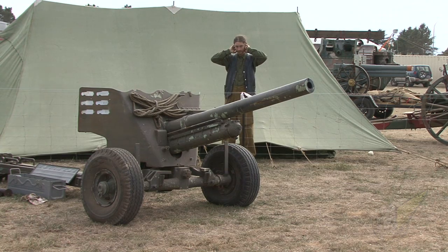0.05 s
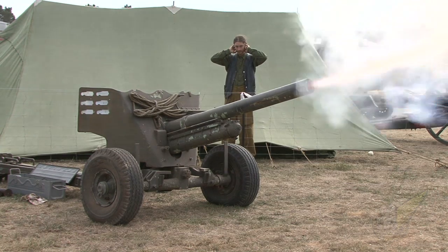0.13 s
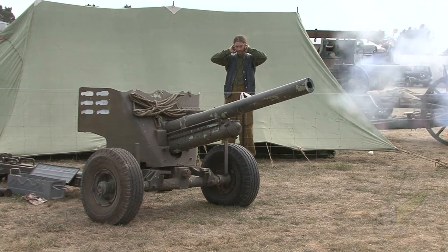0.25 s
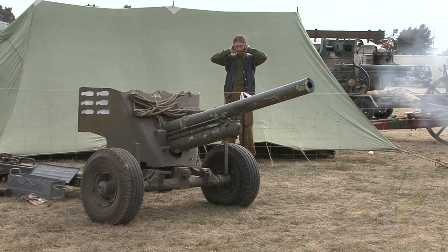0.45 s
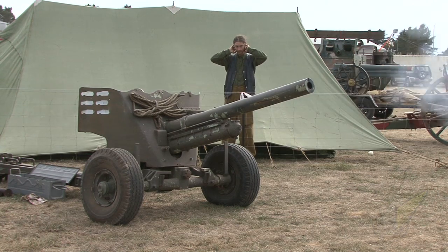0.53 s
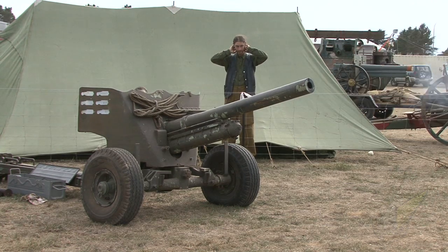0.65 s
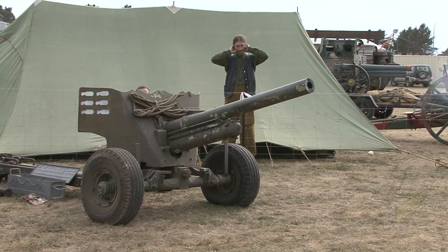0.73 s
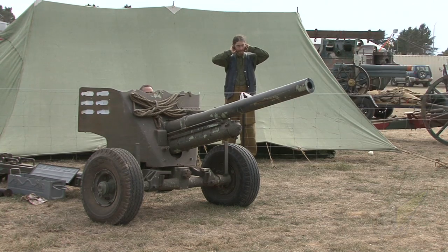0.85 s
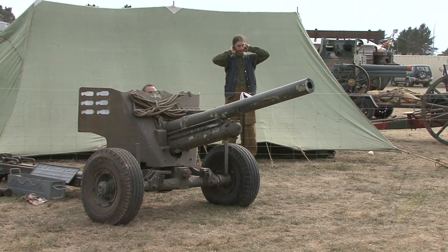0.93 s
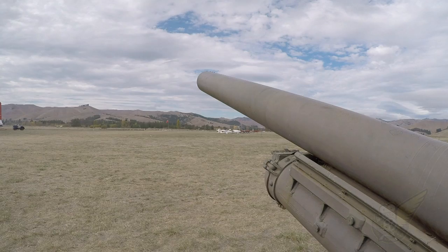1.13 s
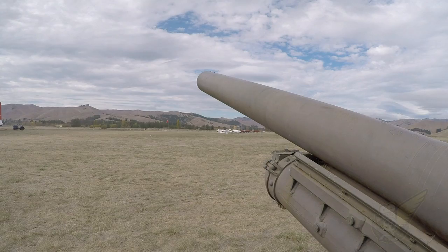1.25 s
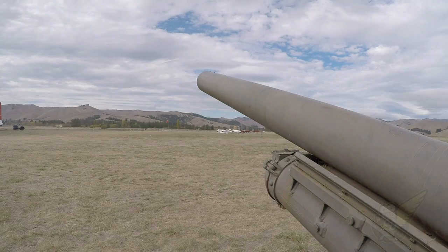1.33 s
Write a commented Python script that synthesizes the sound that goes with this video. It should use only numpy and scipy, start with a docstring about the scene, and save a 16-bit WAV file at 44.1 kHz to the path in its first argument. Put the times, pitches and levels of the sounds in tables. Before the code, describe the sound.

A cannon fires one loud blast that echoes and rolls away over an open field.

```python
"""A field gun fires one round on open grass: a shock front and a burst of gas overload the microphone.
The blast rings the gun's steel, loose parts clang in the recoil and small fittings jingle.
The sound scatters from the ground as a roar, reflects off tents and vehicles as slaps, and rolls away.
A light outdoor background lies beneath; near the end all drops abruptly to a quieter, duller one."""
import sys
import numpy as np
from scipy import signal
from scipy.io import wavfile

SR = 44100
rng = np.random.default_rng(int(sys.argv[2]) if len(sys.argv) > 2 else 0)


def file_out(sig):
    """Save sig as 16-bit WAV at sys.argv[1]."""
    # one column per channel
    cols = np.atleast_2d(sig).T
    # limit, then scale
    lim = np.clip(cols, -1, 1)
    pcm = np.round(lim * 32767).astype(np.int16)
    wavfile.write(sys.argv[1], SR, pcm)


N = 61739
TIME = np.arange(N) / SR
SHOT_S, DROP_S = .2125, 1.215


def from_db(db):
    """Amplitude ratio of a level in decibels."""
    return 10 ** (np.asarray(db) / 20)


def unit_rms(x):
    """Normalisation to rms 1."""
    return x / np.sqrt(np.mean(x ** 2) + 1e-20)


def at_hz(points, hz):
    """Interpolation on a logarithmic frequency axis."""
    freqs, values = np.transpose(points)
    return np.interp(np.log(hz), np.log(freqs), values)


def filtered(x, hz, kind, order=2):
    """Butterworth filter."""
    sections = signal.butter(order, np.clip(hz, 10, .45 * SR), kind, fs=SR, output="sos")
    return signal.sosfilt(sections, x + 1e-18)


def drift(rate_hz):
    """Slow random fluctuation of rms 1."""
    return unit_rms(filtered(rng.standard_normal(2 * N), rate_hz, "low")[N:])


def envelope(start, rise, t60, hold=0):
    """Linear rise, hold, then exponential decay of 60 dB in t60; times in seconds."""
    age = TIME - start
    return np.clip(age / rise, 0, 1) * from_db(-60 * np.maximum(age - rise - hold, 0) / t60)


def noise(spectrum, flutter_db=0, shape=lambda hz: 1):
    """Fluttering third-octave bands of total rms near 1, each then multiplied by shape(hz)."""
    edges = np.geomspace(22, 17500, 30)
    white, common = rng.standard_normal((2, N + 8192)), drift(45)
    out, power = 0, 0
    for k, (low, high) in enumerate(zip(edges, edges[1:])):
        hz = np.sqrt(low * high)
        band = filtered(white[k % 2], [low, high], "band")[-N:]
        if flutter_db:
            band = band * from_db(flutter_db * (.7 * common + 1.2 * drift(27)))
        gain = from_db(at_hz(spectrum, hz)) * np.sqrt(high - low)
        out = out + gain * unit_rms(band) * shape(hz)
        power += gain ** 2
    return out / np.sqrt(power)


# Background spectra before and after the drop: f/Hz, relative density level/dB
AIR_SPECTRUM = [(30, -12), (100, 1), (170, 2), (260, -14.5), (500, -16), (1000, -4.5), (1700, -19),
                (4300, -27.5), (5800, -37.5), (7200, -51.5), (15000, -51)]
CALM_SPECTRUM = [(30, -11.5), (100, 0.5), (160, -5.5), (370, -15), (550, -16.5), (900, -18), (1700, -30.5),
                 (5500, -46), (15000, -51)]
def background(spectrum, level_db):
    """Ambient noise: a steady spectrum whose bands flutter slightly."""
    return from_db(level_db) * noise(spectrum, flutter_db=.5)


# Spectrum of the late return: f/Hz, relative density level/dB
FAR_SPECTRUM = [(300, -18), (1000, 18.5), (2500, 9.5), (4500, 2.5), (8000, -37), (16000, -34)]
def far_return():
    """Long-path reflection: one soft, bright echo arrives late from far off."""
    return from_db(-39.5) * noise(FAR_SPECTRUM, flutter_db=3.5) * envelope(.851, rise=.047, t60=.89)


# Spectrum of the roll: f/Hz, relative density level/dB
ROLL_SPECTRUM = [(30, -34), (65, -4), (160, 0.5), (260, -15), (520, -16.5), (950, -15.5), (1700, -20),
                 (2600, -18), (5500, -36.5), (8000, -50), (15000, -74.5)]
# Its decay: f/Hz, T60/s
ROLL_DECAY = [(50, 1.2), (150, 1.42), (500, 1.03), (3000, 0.71), (12000, 0.42)]
def roll():
    """Reverberation: the report swells and rolls away over the field, the bass lasting longest."""
    def swell(hz):
        return envelope(SHOT_S + .19, rise=.28, t60=at_hz(ROLL_DECAY, hz))
    return from_db(-26) * noise(ROLL_SPECTRUM, flutter_db=2, shape=swell)


# Low echoes: t/s, level/dB, f/Hz, T60/s
BOOMS = [(.256, -11, 129.8, .26), (0.387, -14, 199, 0.12), (0.475, -18, 230, 0.15), (.572, -16, 250, 0.05),
         (0.565, -16.5, 55.6, 0.048), (.614, -16, 361, 0.059), (.634, -15, 98, 0.057),
         (.665, -7, 172, 0.043), (0.811, -37, 85.5, 0.24), (0.823, -28.5, 147.6, 0.26),
         (0.889, -29.5, 178, 0.22)]
def booms():
    """Damped oscillation: echoes that have lost their treble swing at one low frequency each."""
    return sum(from_db(db) * np.sin(2 * np.pi * hz * (TIME - t)) * envelope(t, rise=.004, t60=t60)
               for t, db, hz, t60 in BOOMS)


# Spectra of a slap's crack and scatter: f/Hz, relative density level/dB
CRACK_SPECTRUM = [(100, -3), (1000, 3), (4300, 2.5), (6500, -14), (16000, -24)]
SCATTER_SPECTRUM = [(40, -9.5), (200, -8), (900, 7), (2000, 1), (4500, -2), (7000, -11), (11500, -16),
                    (16000, -49)]
# Reflections: t/s, ring level/dB, ring f/Hz, crack level/dB,
# then for the scatter: level/dB, rise/s, T60/s, cutoff f/Hz
SLAPS = [(.243, -5, 1850, -26, -8.5, .008, 0.098, 5000), (0.268, -5, 1010, -14, -13, .002, 0.059, 5000),
         (.305, -21, 1200, -36, -26, 0.0084, 0.16, 9000),
         (0.3333, -7.5, 420, -16, -16.5, 0.0017, .07, 5000), (.3437, -6, 2640, -2, -13, .001, 0.17, 8100),
         (0.3887, -3.5, 294, -13, -23, 0.0026, 0.044, 5000),
         (.3945, 1.5, 1070, -21.5, -32, .002, 0.088, 4040),
         (.4735, -1.5, 1384, -10, -10.5, 0.0035, 0.052, 4000),
         (.510, -36, 1750, -36, -26, .010, 0.12, 9000),
         (0.5563, 0.5, 1510, -16.5, -16.5, 0.0012, 0.1, 2500),
         (.5703, -2.5, 1870, -4, -18, 0.00082, 0.17, 3000), (.606, -20, 694, -23, -15, 0.0086, 0.12, 1500),
         (.658, -18, 1510, -36, -21, 0.0058, 0.091, 3000),
         (.692, -42, 1200, -42, -30.5, 0.0074, 0.14, 5000),
         (.716, -42, 1080, -42, -31.5, 0.0097, .10, 2500), (.824, -33, 1020, -47, -38, 0.011, 0.19, 2000)]
def slaps():
    """Discrete reflection: tents, vehicles and the gun return a crack, a ring and a puff of scatter."""
    scatter, snap = noise(SCATTER_SPECTRUM, flutter_db=3.5), noise(CRACK_SPECTRUM)
    out, attack_s, ring_cycles = 0, .00051, 7.5
    for k, (t, ring_db, hz, crack_db, scatter_db, rise, t60, cutoff_hz) in enumerate(SLAPS):
        shift = k * N // len(SLAPS)  # each slap has its own stretch of noise
        tone = np.sin(2 * np.pi * hz * (TIME - t))
        ring = from_db(ring_db) * tone * envelope(t, attack_s, t60=ring_cycles / hz)
        crack = from_db(crack_db) * np.roll(snap, shift) * envelope(t, attack_s, t60=.0077)
        dulled = filtered(np.roll(scatter, shift), cutoff_hz, "low", order=1)
        puff = from_db(scatter_db) * dulled * envelope(t, rise, t60)
        out = out + ring + crack + puff
    return out


# Spectrum of the roar: f/Hz, relative density level/dB
ROAR_SPECTRUM = [(25, -22.5), (60, -16.5), (100, 0.5), (170, 2.5), (280, -2.5), (500, -8.5), (850, -3.5),
                 (1200, -3), (1700, -10), (3700, -16), (5500, -22), (7500, -31.5), (11000, -25),
                 (15000, -52)]
# Its decay: f/Hz, T60/s
ROAR_DECAY = [(50, 1), (200, 0.77), (1000, 0.72), (4000, 0.81), (14000, 0.16)]
def ground_roar():
    """Diffuse scattering: dense returns from the near ground hold briefly, then die, treble first."""
    def decay(hz):
        return envelope(SHOT_S, rise=.0047, hold=.16, t60=at_hz(ROAR_DECAY, hz))
    return from_db(-13.5) * noise(ROAR_SPECTRUM, flutter_db=3.5, shape=decay)


# Modes of the small fittings: f/Hz, relative level/dB
FITTING_MODES = [(1690, 6), (2140, -0.5), (3250, 1.5), (3480, -1.5), (3750, -1), (4290, -3.5), (4560, 2.5),
                 (4850, -10), (6170, -10), (8100, -18)]
def jingle():
    """Impulse excitation: as the gun settles, random light touches ring each mode of its fittings."""
    start_s, length_s, touches_per_s, t60, level_db = .875, .10, 38, .046, -40
    shaking = (TIME > start_s) * (TIME < start_s + length_s)
    radius = from_db(-60 / (t60 * SR))
    out = 0
    for hz, db in FITTING_MODES:
        touches = shaking * (rng.random(N) < touches_per_s / SR) * rng.uniform(.4, 1, N)
        angle = 2 * np.pi * hz / SR
        poles = [1, -2 * radius * np.cos(angle), radius ** 2]
        out = out + from_db(level_db + db) * signal.lfilter([0, np.sin(angle)], poles, touches + 1e-18)
    return out


# Impacts of loose steel in the recoil: t/s, level/dB, f/Hz, T60/s
CLANGS = [(.215, 7, 573.6, 0.054), (.285, -6.5, 821, .09), (.342, -19, 1180, 0.06),
          (.464, -7.5, 913, 0.063), (0.57, -20.5, 4150, 0.099), (.572, -26, 3950, 0.033),
          (0.577, -26, 4410, 0.051), (0.572, -15, 1025, 0.06), (.778, -35, 1345, 0.08)]
def clangs():
    """Beating: each loose part rings briefly in two modes of nearly equal frequency."""
    out, upper_gain, beat_hz = 0, .15, 45
    for t, db, hz, t60 in CLANGS:
        turn = 2 * np.pi * (TIME - t)
        pair = np.sin(turn * hz) + upper_gain * np.sin(turn * (hz + beat_hz))
        out = out + from_db(db) * pair / (1 + upper_gain) * envelope(t, rise=.007, t60=t60)
    return out


# Modes of barrel and shield: f/Hz, bandwidth/Hz, relative level/dB
STEEL_MODES = [(794, 50, -0.5), (980, 50, -5.5), (1170, 55, -19.5), (1700, 170, -12.5), (1990, 70, -8.5),
               (2724, 160, -3.5), (3170, 120, -14), (4260, 300, -12.5)]
def steel_ring():
    """Resonance: shaken by the blast, barrel and shield respond in narrow bands."""
    modes = 0
    for hz, width, db in STEEL_MODES:
        band = filtered(rng.standard_normal(N), [hz - width / 2, hz + width / 2], "band", order=1)
        modes = modes + from_db(db) * unit_rms(band)
    return from_db(-23.5) * unit_rms(modes) * envelope(SHOT_S, rise=.097, t60=1)


# Spectrum of the muzzle gas: f/Hz, relative density level/dB
GAS_SPECTRUM = [(30, -18), (150, -1.5), (550, 2.5), (1500, 2.5), (3000, -4), (7000, -13), (16000, -23.5)]
def muzzle_blast():
    """Shock wave: an N-shaped front leads a burst of gas noise that holds briefly and dies quickly."""
    shock_db, shock_s = 4.5, .00072
    gas_db, hold_s, fall_db_per_s = 10, .016, 1700
    age = TIME - SHOT_S
    shock = from_db(shock_db) * (2 * age / shock_s - 1) * (age < shock_s)
    gas = from_db(gas_db - fall_db_per_s * np.maximum(age - hold_s, 0)) * noise(GAS_SPECTRUM)
    return (age >= 0) * (shock + gas)


def scene():
    """Superposition of background, returns and gun; from DROP_S on, only the calmer background."""
    returns = far_return() + roll() + booms() + slaps() + ground_roar()
    returns = filtered(returns, 12000, "low", order=4)  # air absorption
    gun = jingle() + clangs() + steel_ring() + muzzle_blast()
    field = background(AIR_SPECTRUM, level_db=-40.5) + returns + gun
    calm = background(CALM_SPECTRUM, level_db=-46.5)
    return np.where(TIME < DROP_S, field, calm)[None]


def record(dry):
    """Overload: the input clips, a fast limiter pulls the level down and a low-pass cuts the top."""
    ceiling, limit_db, response_s, cutoff_hz = .78, -9.5, .0025, 15900
    clipped = np.clip(dry, -ceiling, ceiling)
    memory = np.exp(-1 / (response_s * SR))
    running_rms = np.sqrt(signal.lfilter([1 - memory], [1, -memory], clipped ** 2) + 1e-12)
    limited = clipped * np.minimum(1, from_db(limit_db) / running_rms)
    return signal.sosfilt(signal.ellip(10, .1, 80, cutoff_hz, fs=SR, output="sos"), limited)


dry = scene()
out = record(dry)
file_out(out)
```